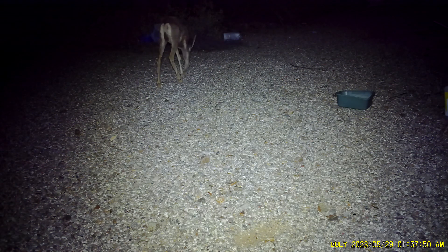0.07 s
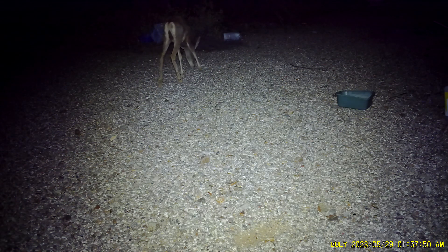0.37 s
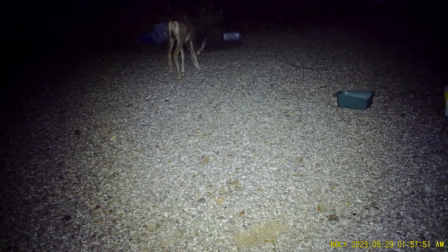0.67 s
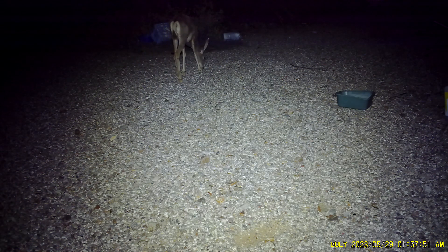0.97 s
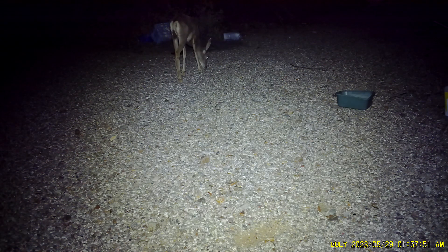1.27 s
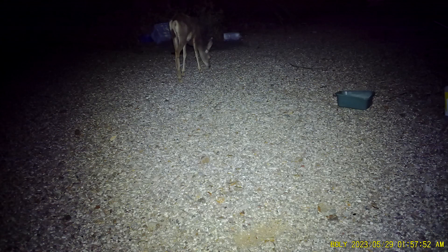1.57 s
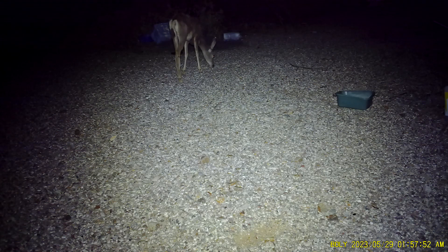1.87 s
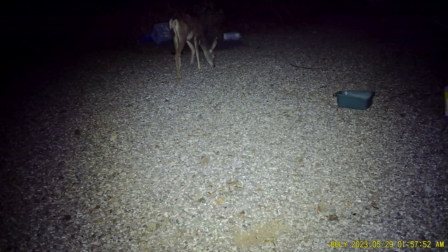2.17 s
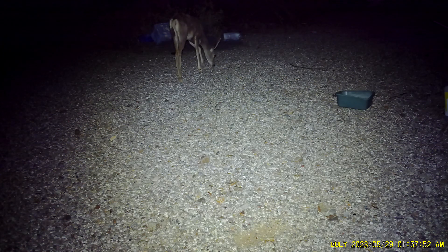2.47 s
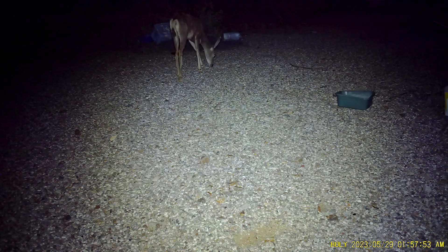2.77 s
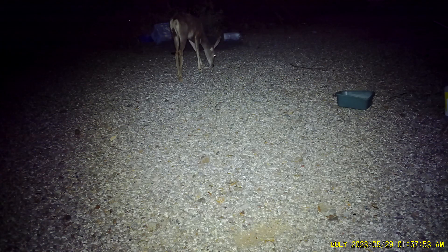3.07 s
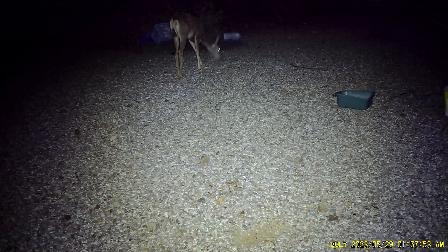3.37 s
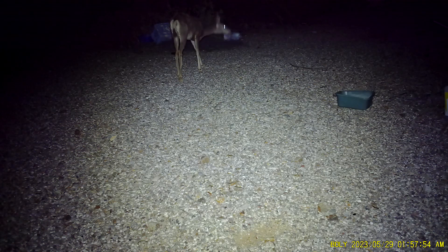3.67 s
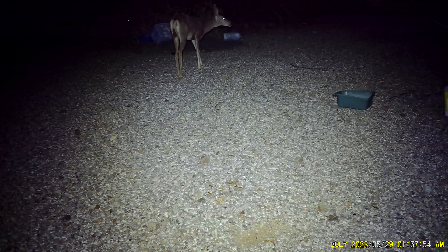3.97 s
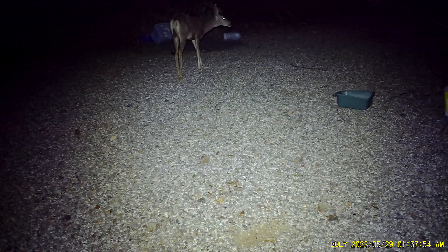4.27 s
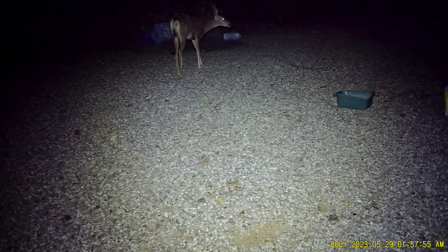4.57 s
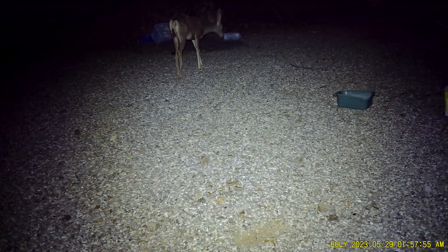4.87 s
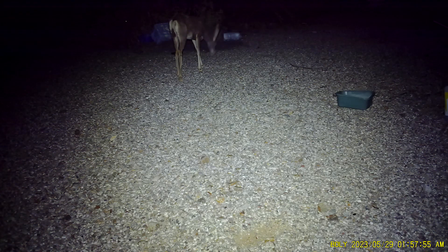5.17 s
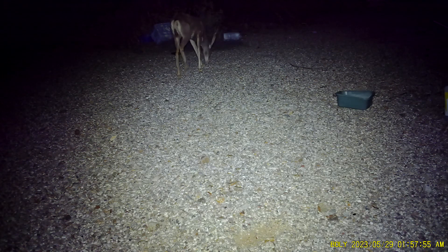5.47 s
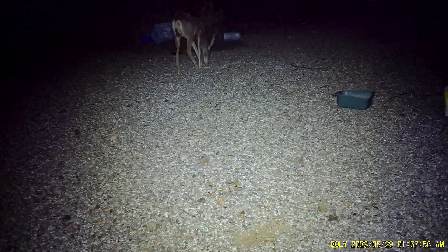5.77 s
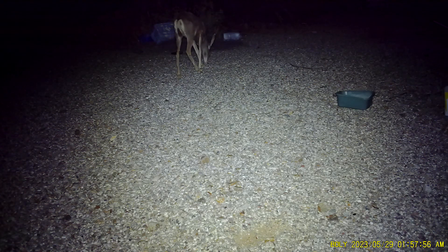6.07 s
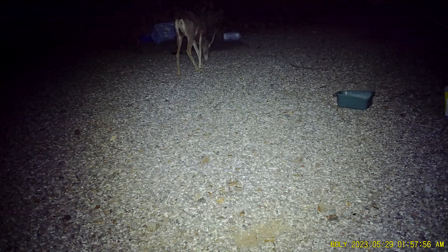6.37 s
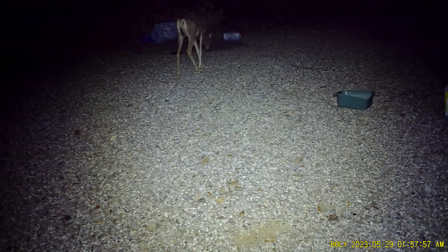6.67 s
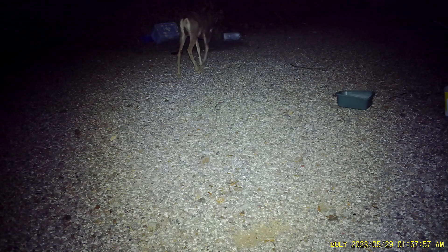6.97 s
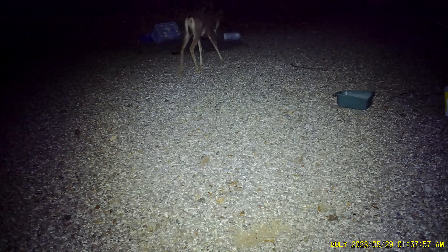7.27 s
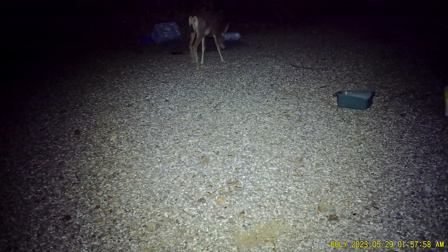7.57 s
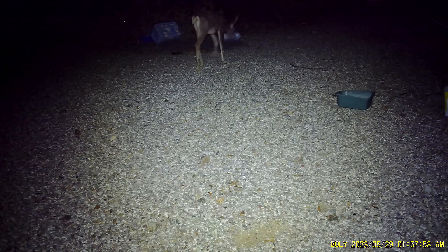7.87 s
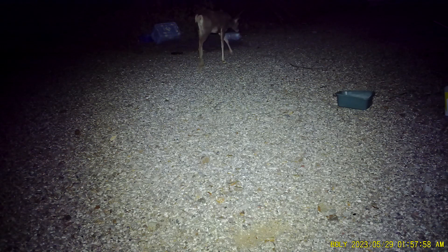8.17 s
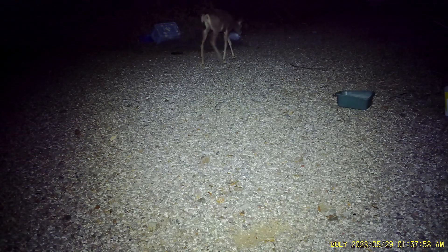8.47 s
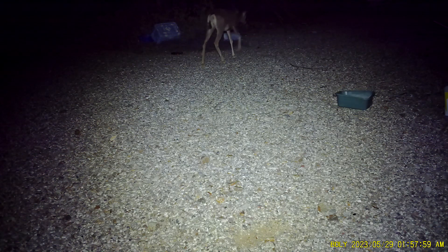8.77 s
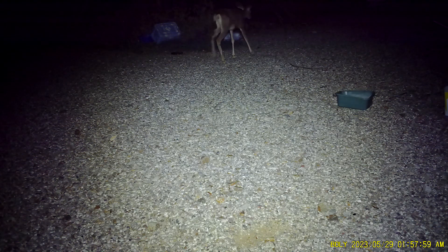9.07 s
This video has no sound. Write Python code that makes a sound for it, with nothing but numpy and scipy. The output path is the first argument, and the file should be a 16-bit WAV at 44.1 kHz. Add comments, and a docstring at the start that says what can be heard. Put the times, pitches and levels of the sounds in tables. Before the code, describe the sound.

Faint, scattered hoof crunches on gravel at night, above deep outdoor rumble, microphone hiss and a distant engine.

```python
"""Gravel crunches and pebbles click as a deer walks slowly over a yard at night, some metres from a
fixed outdoor camera. Each hoof makes the stones slip and knock together, and these brief contacts
excite a damped ring and a bright snap. One soft hollow tone sounds among the first steps.
Underneath lie low rumble with puffs of air, the slowly beating hum of far machines, a distant engine
that rises and falls, a wash of traffic and the hiss of the microphone."""
import sys
import numpy as np
from scipy import signal
from scipy.fft import rfft, irfft
from scipy.io import wavfile
from scipy.ndimage import uniform_filter1d

SR = 44100
rng = np.random.default_rng(int(sys.argv[2]) if len(sys.argv) > 2 else 0)


def to_wav(sig):
    """Store sig (one row per channel, or 1-D mono) as 16-bit WAV at the path in sys.argv[1].

    Samples outside -1..1 are clipped; the rate is SR.
    """
    pcm = np.clip(np.atleast_2d(sig), -1, 1) * 32767
    pcm = np.round(pcm).astype(np.int16)
    wavfile.write(sys.argv[1], SR, pcm.T)  # frames by channels


N = 406602

# The loudest pebbles, kicked or cracked under a hoof. Each row: start in seconds, relative level in dB,
# ring frequency in Hz, snap over knock in dB.
PEBBLE_IMPACTS = [(0.239, -51.5, 1830, 1), (0.2405, -52.5, 1710, -1), (0.2467, -51, 1700, 4),
                  (0.2528, -50.5, 2400, -1), (0.256, -57, 2060, 2), (0.332, -69, 2330, 10),
                  (0.5122, -55.5, 1910, -4), (0.6812, -55.5, 2140, -5), (0.7308, -54.5, 1800, -8.5),
                  (2.332, -54.5, 1750, -7), (2.375, -67, 2000, 6), (2.404, -55, 1980, -15),
                  (3.07, -58, 2220, -16), (3.113, -59.5, 2420, -22), (5.6832, -58.5, 2310, -4),
                  (7.1833, -56.5, 1990, -4), (7.3035, -55.5, 2640, -25), (7.3682, -59, 1620, -12),
                  (7.4006, -54.5, 1850, -13), (7.4434, -53, 2290, -10), (7.4589, -50, 1640, -16),
                  (7.469, -54.5, 1830, -14), (7.492, -53.5, 2130, -14), (7.508, -55, 1980, -16),
                  (7.594, -48.5, 2100, -18), (8.2054, -54, 1450, -24), (8.264, -54, 1810, -11),
                  (8.3574, -58.5, 2480, -11), (8.4268, -60, 2430, -12), (8.456, -56, 2520, -26),
                  (8.4937, -55, 2400, -15), (8.613, -57, 2320, -8), (9.0148, -56.5, 1560, -19),
                  (9.0455, -54, 1640, -17)]
# A hoof presses or drags the gravel. Each row: start in seconds, length in seconds, relative level in dB,
# ring frequency in Hz, snap over knock in dB.
HOOF_PRESSES = [(0.245, 0.025, -53.5, 1600, -7), (0.267, .007, -58, 3000, -8),
                (0.285, .025, -65, 1400, -10), (0.309, .02, -62, 1550, -5), (0.439, .018, -56.5, 2800, -8),
                (0.502, .055, -68, 2200, -10), (0.95, .06, -63, 1910, -10), (2.329, 0.013, -60, 1850, -4),
                (2.364, .09, -65, 1900, -6), (2.539, .05, -68, 1650, -8), (4.234, .055, -69, 2700, -10),
                (5.668, 0.062, -67.5, 1950, -8), (7.18, 0.076, -62, 2100, -7.5),
                (7.305, .04, -64, 2720, -9), (7.343, 0.011, -57.5, 2420, -8), (7.361, .15, -72, 2000, -8),
                (7.68, 0.018, -57.5, 1610, -11), (8.136, .02, -61.5, 2200, -8),
                (8.188, 0.037, -62.5, 1450, -9), (8.237, 0.065, -62.5, 1600, -10),
                (8.43, 0.086, -71, 2500, -10), (8.983, 0.087, -64, 1650, -17)]

def hooves(pebble_db=0.96, crunch_db=-1.0, loose_per_s=55, loose_db=1, settle_s=.015, scatter_octaves=.12):
    """Granular flow: gravel yields under each hoof and shakes pebbles loose; larger ones knock clearly."""
    mix = np.zeros(N)
    for start, *impact in PEBBLE_IMPACTS:
        add(mix, start, gain_of(pebble_db) * pebble(*impact))
    for start, length, db, ring_hz, snap_db in HOOF_PRESSES:
        add(mix, start, gain_of(crunch_db) * crunch(length, db, ring_hz, snap_db))
        for delay in np.cumsum(rng.exponential(1 / loose_per_s, size=14)):
            loose_hz = ring_hz * 2 ** (scatter_octaves * rng.standard_normal())
            knock = pebble(db + loose_db, loose_hz, snap_db)
            if delay < length + settle_s:
                add(mix, start + delay, knock)
    return mix

def crunch(length, db, ring_hz, snap_db, slips_per_s=3500, rise_s=.00063, release_s=.0022, size=8192):
    """Stick-slip friction: many tiny slips while the hoof bears down, dying away as the stones settle."""
    t = np.arange(size) / SR
    pressure = (1 - np.exp(-t / rise_s)) * np.exp(-.5 * t / length - np.maximum(t - length, 0) / release_s)
    unevenness_db = 3 * np.minimum(rng.exponential(1, size), 3)
    strength = gain_of(unevenness_db) * rng.choice([-1, 1], size)
    slips = pressure * strength * (rng.random(size) < slips_per_s / SR)
    return stones(slips, length, db, ring_hz, snap_db, ring_s=.00057, ring_db=-15)

def pebble(db, ring_hz, snap_db, chatter_s=.0011, size=1024):
    """Impact: one hard impulse between two stones, then an exponentially decaying chatter."""
    contacts = .56 * rng.standard_normal(size) * np.exp(-np.arange(size) / SR / chatter_s)
    contacts[0] = 2
    return stones(contacts, .0027, db, ring_hz, snap_db, ring_s=.00038, ring_db=-11)

# Spectra of stones knocking and of their edges snapping. Each row: frequency in Hz, relative gain in dB.
KNOCK_SPECTRUM = [(300, -16), (800, -5), (1300, -3.5), (1800, 0), (2700, 3.5), (3300, -0.5), (4300, -9),
                  (7000, -48), (16000, -44)]
SNAP_SPECTRUM = [(1000, -30), (3000, 1), (4400, -3), (5300, 0.5), (6300, 6), (7700, 4.5), (9500, 3),
                 (10400, -6.5), (14000, -9.5), (16000, -20)]

def stones(contacts, length, db, ring_hz, snap_db, ring_s, ring_db, ring_loss=.74):
    """Impulse response: contacts excite a knock, a damped mode and a snap; more snap means less ring."""
    t = np.arange(len(contacts)) / SR
    mode = np.sin(2 * np.pi * ring_hz * t) * np.exp(-t / ring_s)
    broad = colour(contacts, KNOCK_SPECTRUM)
    ringing = signal.fftconvolve(broad, mode)[:len(t)]
    knock = gain_of(ring_db - ring_loss * snap_db) * unit_rms(ringing) + unit_rms(broad)
    snap = colour(contacts, SNAP_SPECTRUM)
    return gain_of(db) * (with_energy(knock, length) + gain_of(snap_db) * with_energy(snap, length))

def yard_echoes(x, wet_db=-12, t60=.35, echoes_per_s=2000, size=12000):
    """Scattering: the ground and things around return weak, decaying reflections."""
    t = np.arange(size) / SR
    echoes = rng.standard_normal(size) * (rng.random(size) < echoes_per_s / SR)
    echoes *= gain_of(-60 * t / t60) * (t > .003)
    return x + gain_of(wet_db) * signal.fftconvolve(x, echoes / np.linalg.norm(echoes))[:N]

# One hollow tone. Its row: start in seconds, length in seconds, frequency in Hz, level in dB.
HOLLOW_NOTE = (0.483, .088, 558, -61.5)

def hollow_tone():
    """Tone burst: a short sinusoid whose tapered ends keep it soft and nearly pure."""
    start, length, hz, db = HOLLOW_NOTE
    t, mix = np.arange(int(length * SR)) / SR, np.zeros(N)
    taper = signal.windows.tukey(len(t), .5)
    add(mix, start, gain_of(db) * np.sqrt(2) * taper * np.sin(2 * np.pi * hz * t))
    return mix

# Spectra of the rumble and of a puff of air. Each row: frequency in Hz, relative density in dB.
RUMBLE_SPECTRUM = [(3, -5), (12, -4.5), (22, -2.5), (28, -8.5), (37, -6), (50, -12.5), (62, -7), (70, -15),
                   (80, -15), (92, -18), (122, -16.5), (150, -26), (230, -44.5), (600, -68)]
PUFF_SPECTRUM = [(2, -8), (6, 4), (14, -4.5), (25, -12), (50, -25), (100, -30), (300, -73)]
# Slow drift of the rumble. Each row: time in seconds, level in dB.
RUMBLE_DRIFT = [(0, -47.5), (0.9, -49.5), (2.5, -47.5), (3.6, -48.5), (5.3, -47), (7.8, -50), (9.22, -48.5)]
# Puffs of air. Each row: peak time in seconds, Gaussian width in seconds, peak level in dB.
AIR_PUFFS = [(1.4, .06, -40.5), (1.95, 0.24, -46), (2.8, 0.09, -39.5), (3.77, 0.04, -35.5),
             (4.55, 0.21, -42.5), (5.7, 0.14, -39), (6.13, 0.053, -40.5)]

def rumble():
    """Low-frequency pressure fluctuation: deep outdoor noise, with puffs of air on the microphone."""
    t = np.arange(N) / SR
    wind = sum(gain_of(db) * np.exp(-.5 * ((t - peak) / width) ** 2) for peak, width, db in AIR_PUFFS)
    low, puff = noise(RUMBLE_SPECTRUM), noise(PUFF_SPECTRUM)
    # Hold each noise's power steady over a quarter second, so the envelopes set the swells.
    low, puff = (x / np.sqrt(uniform_filter1d(x ** 2, size=SR // 4)) for x in (low, puff))
    return gain_of(np.interp(t, *np.transpose(RUMBLE_DRIFT))) * low + wind * puff

# Far machines humming in pairs. Each row: frequency in Hz, level in dB, beat rate in Hz,
# partner's relative level in dB, time of one swell in seconds.
MACHINE_PAIRS = [(27.2, -51.5, 0.389, -7.5, 2.55), (58.53, -56, 0.787, -3, 0.19)]
# Faint steady tones, from low hums to high whines. Each row: centre frequency in Hz, level in dB,
# half-width in Hz.
STEADY_TONES = [(62.53, -62, 0.52), (84.1, -62.5, 0.51), (238.5, -77, 2.3), (1013, -81.5, 8.7),
                (3220, -82.5, 44), (3540, -83.5, 130)]

def machine_hum(wander_hz=.6):
    """Beating: machines of nearly equal speed interfere; narrow bands of noise add faint steady tones."""
    t, mix = np.arange(N) / SR, np.zeros(N)
    for hz, db, beat_hz, partner_db, swell_s in MACHINE_PAIRS:
        wander = wander_hz * noise([(.5, -.5), (3, -.5), (10, -30.5), (100, -120)])
        cycles = np.cumsum(hz + wander) / SR
        partner = gain_of(partner_db) * np.sin(2 * np.pi * (cycles + beat_hz * (t - swell_s)))
        mix += gain_of(db) * np.sqrt(2) * (np.sin(2 * np.pi * cycles) + partner)
    bins_hz = np.fft.rfftfreq(N, 1 / SR)
    for centre, db, half_width in STEADY_TONES:
        band = rfft(rng.standard_normal(N)) / (1 + ((bins_hz - centre) / half_width) ** 2)
        mix += gain_of(db) * unit_rms(irfft(band, N))
    return mix

# An engine revs up, eases off and pulls twice more. Each row: time in seconds, firing rate in Hz,
# relative level in dB.
ENGINE_REVS = [(5.2, 96, -62), (5.75, 109.5, -63.5), (6.0, 121, -51), (6.701, 149, -61), (6.87, 137, -55),
               (7.171, 120.5, -50), (7.33, 111.2, -67), (7.78, 118.7, -54), (8.1, 128.5, -70.5),
               (8.401, 119.8, -55.5), (8.65, 113.5, -62), (9.22, 108, -58)]

def distant_engine(level_db=-2, octave_db=-18, waver=.00601, fade_s=.2):
    """Periodic firing: from far away only the fundamental and a trace of the second harmonic arrive."""
    times, hz, db = np.transpose(ENGINE_REVS)
    t = np.arange(N) / SR
    jitter = waver * noise([(1, 2), (10, 6), (40, -33), (200, -120)])
    firing_hz = np.interp(t, times, hz) * (1 + jitter)
    phase = 2 * np.pi * np.cumsum(firing_hz) / SR
    note = np.sqrt(2) * (np.sin(phase) + gain_of(octave_db) * np.sin(2 * phase))
    fade = np.clip(np.minimum(t - times[0], times[-1] - t) / fade_s, 0, 1)
    return fade * gain_of(level_db + np.interp(t, times, db)) * note

# Spectrum of far traffic. Each row: frequency in Hz, relative density in dB.
TRAFFIC_SPECTRUM = [(100, -4.5), (190, 2.5), (320, 0.5), (700, -5), (950, -6), (1400, -21.5), (4000, -61)]
# Slow drift of the traffic. Each row: time in seconds, level in dB.
TRAFFIC_DRIFT = [(0, -66), (1, -67), (3, -67), (5, -68), (6.5, -66.5), (7.5, -64.5), (8.4, -64),
                 (9.22, -66.5)]

def far_traffic():
    """Amplitude-modulated noise: a dull wash of traffic that swells a little near the end."""
    level_db = np.interp(np.arange(N) / SR, *np.transpose(TRAFFIC_DRIFT))
    return gain_of(level_db) * noise(TRAFFIC_SPECTRUM)

# Spectrum of night air and microphone hiss. Each row: frequency in Hz, relative density in dB.
HISS_SPECTRUM = [(60, -33), (200, -33.5), (340, -39), (450, -35.5), (750, -37.5), (1000, -41.5),
                 (1250, -44), (1800, -46), (3000, -49), (4500, -51.5), (7500, -53.5), (10500, -54.5),
                 (14800, -54.5), (16000, -72)]

def hiss(level_db=-60):
    """Stationary broadband noise: the even hiss of night air and the microphone."""
    return gain_of(level_db) * noise(HISS_SPECTRUM)

def gain_of(db):
    """Decibels to amplitude."""
    return 10 ** (np.asarray(db) / 20)

def unit_rms(x):
    """Normalises to an rms of one."""
    return x / np.sqrt(np.mean(x ** 2) + 1e-20)

def with_energy(x, length):
    """Scales a burst to the energy of a unit-rms sound lasting length seconds."""
    return x * np.sqrt(length * SR / (np.sum(x ** 2) + 1e-20))

def gain_at(spectrum, hz):
    """Amplitude of a spectrum, interpolated in dB on a log-frequency axis."""
    points_hz, db = np.transpose(spectrum)
    return gain_of(np.interp(np.log(hz + 1), np.log(points_hz + 1), db))

def noise(spectrum):
    """Spectral shaping: steady Gaussian noise with an rms of one."""
    white = rfft(rng.standard_normal(N))
    return unit_rms(irfft(white * gain_at(spectrum, np.fft.rfftfreq(N, 1 / SR)), N))

def colour(x, spectrum, size=512):
    """Minimum-phase filtering: the response is causal, so attacks stay sharp."""
    log_gain = np.log(gain_at(spectrum, abs(np.fft.fftfreq(size, 1 / SR))))
    taps = np.fft.ifft(np.exp(np.conj(signal.hilbert(log_gain)))).real
    return signal.fftconvolve(x, taps[:size // 2])[:len(x)]

def add(mix, start_s, sound):
    """Superposes a sound on the mix."""
    part = mix[max(round(start_s * SR), 0):][:len(sound)]
    part += sound[:len(part)]

def scene():
    """Superposition: the steps and their echoes over the night background, in mono."""
    background = hiss() + far_traffic() + rumble() + machine_hum() + distant_engine()
    return (yard_echoes(hooves()) + hollow_tone() + background)[None]

def record(dry):
    """Band limiting: the camera passes sound up to 15850 Hz."""
    lowpass = signal.firwin(511, 15850, window=("kaiser", 9), fs=SR)
    return signal.oaconvolve(dry, lowpass[None], "same")

dry = scene()
out = record(dry)
to_wav(out)
```